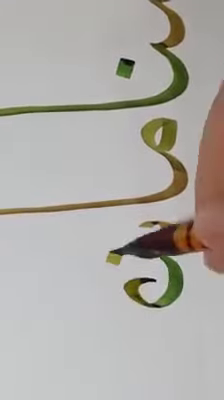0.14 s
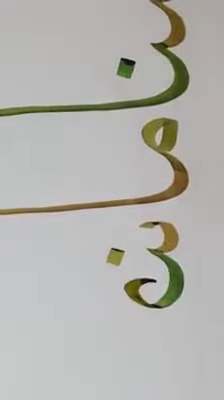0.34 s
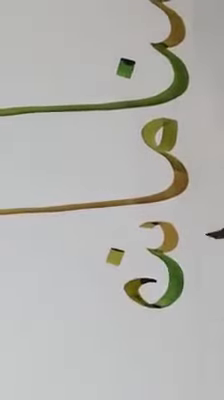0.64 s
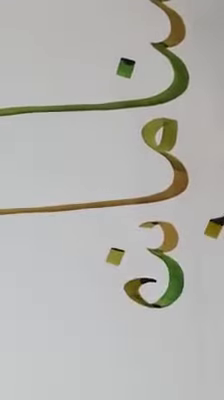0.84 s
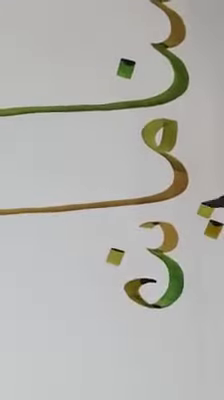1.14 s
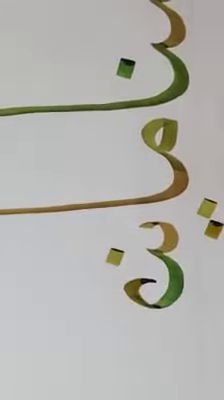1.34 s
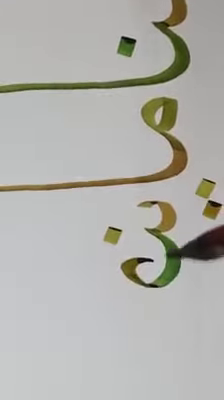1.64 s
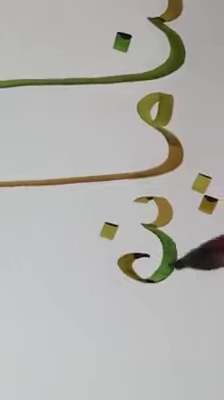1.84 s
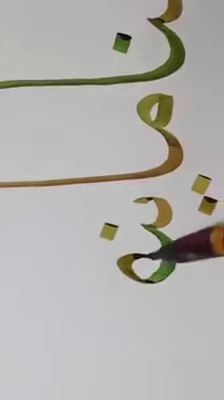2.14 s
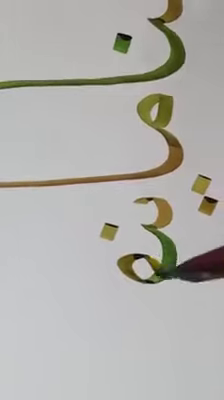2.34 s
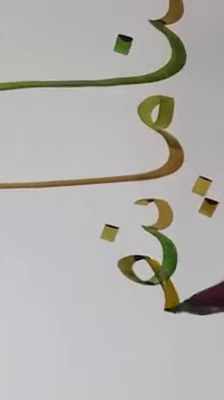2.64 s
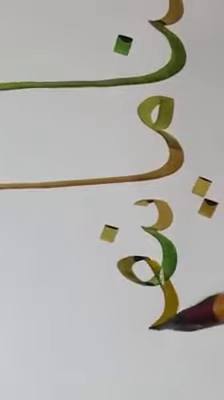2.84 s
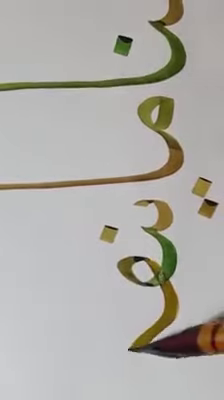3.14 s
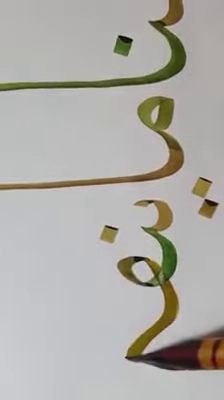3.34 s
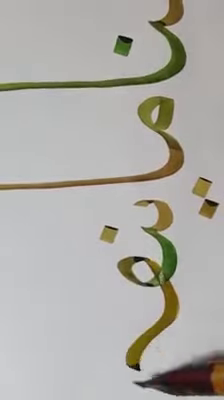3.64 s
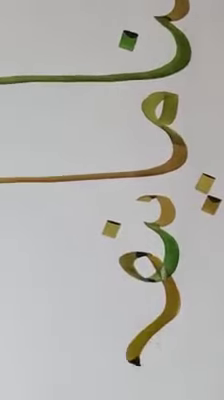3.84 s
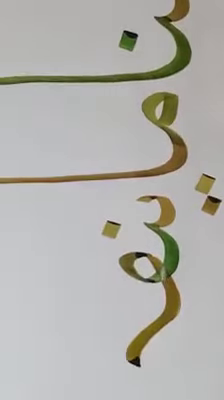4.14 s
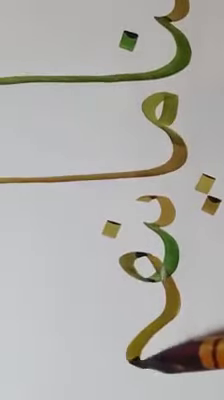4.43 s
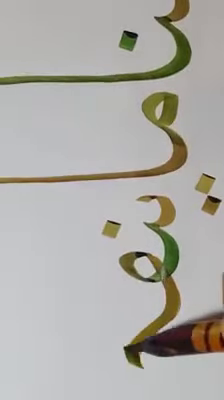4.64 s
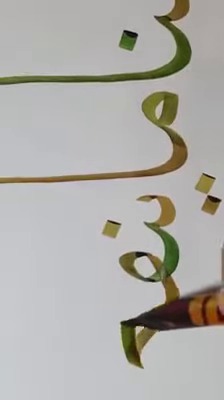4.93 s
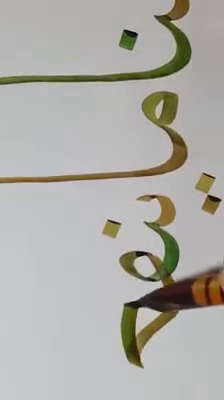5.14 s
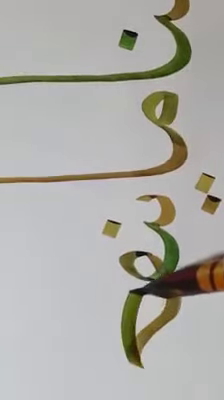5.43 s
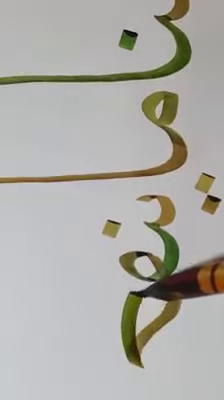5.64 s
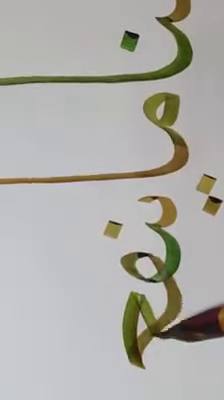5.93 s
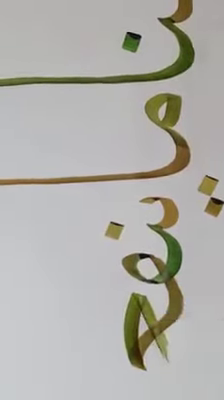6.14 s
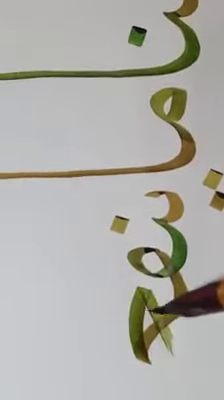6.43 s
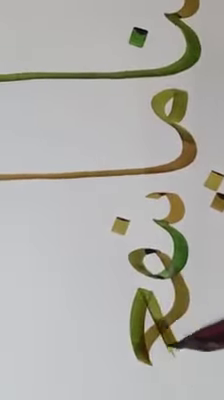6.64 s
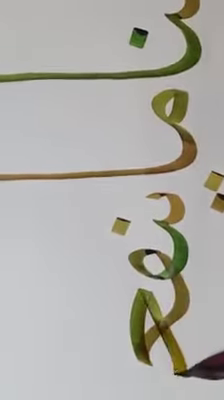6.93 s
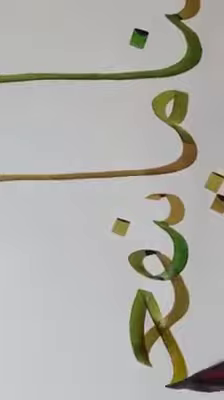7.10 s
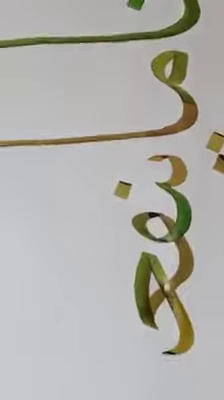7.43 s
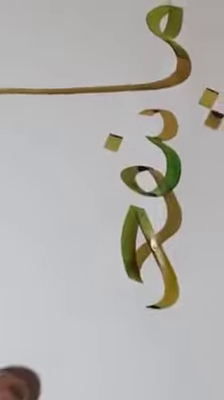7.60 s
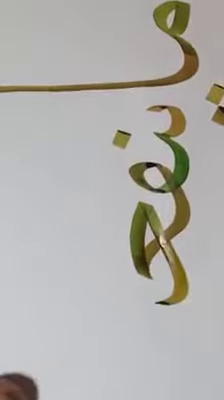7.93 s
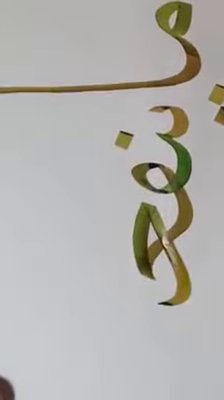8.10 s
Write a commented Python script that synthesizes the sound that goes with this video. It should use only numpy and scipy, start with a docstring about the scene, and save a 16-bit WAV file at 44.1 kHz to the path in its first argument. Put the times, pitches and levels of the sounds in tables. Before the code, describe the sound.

Close, dry calligraphy sounds: soft hand rubs and thuds, crisp nib clicks, one strong scrape ending in a chirpy flick, quiet hum beneath.

```python
"""A desk in a quiet room, microphone close to the sheet: hum and faint hiss lie underneath throughout.
First the writing hand slides and bumps, with faint ticks and one flick just before 1 s. Near 2.4 s the broad
nib snaps in loud ticks, then stutters and ticks finely until the hand is left alone near 4 s. Slow pulls
follow, then the strongest scrape at 5.8 s and the loudest flick, a chirp near 6 s. More ticks and strokes
lead to sharp flicks at 7.3 s; the hand slides on to the end, with a last faint flick and stroke."""
import sys
import numpy as np
from scipy import signal
from scipy.fft import rfft, irfft
from scipy.io import wavfile
from scipy.ndimage import uniform_filter1d

SR = 44100
rng = np.random.default_rng(int(sys.argv[2]) if len(sys.argv) > 2 else 0)


def bounce(signal):
    """Save signal as a 16-bit WAV file at the path given by the first command-line argument."""
    frames = np.transpose(np.atleast_2d(signal))
    limited = np.clip(frames, -1, 1)
    pcm = np.round(limited * 32767).astype(np.int16)
    wavfile.write(sys.argv[1], SR, pcm)


N = 364266
TIME = np.arange(N) / SR
TOP_HZ = 9750  # upper limit of the recorder


def undb(db):
    """Decibels to amplitude gain."""
    return 10 ** (np.asarray(db) / 20)


def unit(x):
    """Scale to rms 1."""
    return x / np.sqrt(np.mean(x ** 2))


def add(out, x, start_s):
    """Mix x into out from start_s on."""
    i = max(int(start_s * SR), 0)
    out[i:i + len(x)] += x[:len(out) - i]


def colour(x, spectrum, size=8192):
    """Causal minimum-phase filter with the given spectrum, from the cepstrum of its log gain; rms 1."""
    point_hz, point_db = np.transpose(spectrum)
    hz = np.maximum(np.fft.rfftfreq(size, 1 / SR), 1)
    gain_db = np.interp(np.log(hz), np.log(point_hz), point_db)
    cepstrum = irfft(np.log(undb(gain_db)))
    # fold the cepstrum onto positive time, so that nothing sounds early
    cepstrum[1:size // 2] *= 2
    cepstrum[size // 2 + 1:] = 0
    response = irfft(np.exp(rfft(cepstrum)))
    return unit(signal.fftconvolve(x, response)[:len(x)])


def resonate(x, hz, width_hz):
    """One resonance, gain 1 at its centre."""
    return signal.lfilter(*signal.iirpeak(hz, hz / width_hz, fs=SR), x)


def band(x, low_hz, high_hz):
    """Band-pass without delay."""
    return signal.sosfiltfilt(signal.butter(2, [low_hz, high_hz], "band", fs=SR, output="sos"), x)


def dull(x, corner_hz):
    """Gentle one-pole roll-off of the treble."""
    pole = np.exp(-2 * np.pi * corner_hz / SR)
    return signal.lfilter([1 - pole], [1, -pole], x)


def walk(rate_hz):
    """Smooth random wander of rms near 1, with rate_hz new targets a second."""
    step = int(SR / rate_hz)
    targets = np.repeat(rng.standard_normal(N // step + 1), step)
    return unit(uniform_filter1d(targets, step)[:N])


def grains(rate_hz, spread_db):
    """Random tiny slips, at a rate that may change: many small, a few large; rms 1."""
    hit = rng.random(N) < rate_hz / SR
    size = undb(spread_db * np.minimum(rng.exponential(size=N), 3))
    sign = rng.choice([-1, 1], N)
    return unit(hit * size * sign / np.sqrt(rate_hz))  # even power when the rate changes


def swell(rise_s, fall_s, size=4096):
    """Envelope that grows exponentially to 1 and dies away, and the time of its top."""
    top_s = size / 3 / SR
    t = np.arange(size) / SR - top_s
    return np.exp(np.where(t < 0, t / rise_s, -t / fall_s)), top_s


def gesture(start_s, length_s, attack_s, release_s):
    """Attack, hold and release of one movement, and its progress from -1 to 1."""
    t = TIME - start_s
    attack = np.clip(t / attack_s + .5, 0, 1)
    release = np.clip((length_s - t) / release_s + .5, 0, 1)
    return attack * release, np.clip(2 * t / length_s - 1, -1, 1)


# spectrum of the quiet room's hiss: freq_hz, density_db
ROOM_SPECTRUM = [(25, 1), (45, 1), (70, 1.5), (110, -4), (250, -2), (340, -13.5), (560, -18), (1270, -21.5),
                 (1360, -11.5), (1450, -21), (3500, -22.5), (6500, -28), (9000, -33), (11000, -53)]


def room_tone(hum_hz=49, waver_hz=5, hum_db=-65.5, hiss_db=-65):
    """All around: a low sine hum that wavers in pitch and strength, and smooth filtered-noise hiss."""
    pitch_hz = hum_hz + waver_hz * walk(rate_hz=26)
    phase = 2 * np.pi * np.cumsum(pitch_hz) / SR
    hum = unit(np.sin(phase)) * undb(hum_db + 3.0 * walk(rate_hz=13))
    hiss = colour(rng.standard_normal(N), ROOM_SPECTRUM)
    return hum + hiss * undb(hiss_db + .5 * walk(rate_hz=3))


def reflections(x, wet_db=-19, gap_s=0.0011, t60_s=.09, size=8192):
    """A weak, very short echo from the desk and things near it: a decaying noise tail."""
    t = np.arange(size) / SR
    decay = np.exp(-np.log(1000) * t / t60_s) * (t > gap_s)
    tail = band(rng.standard_normal(size), 180, 10000) * decay
    return undb(wet_db) * signal.fftconvolve(x, tail / np.linalg.norm(tail))[:N]


# the hand slides over the sheet, close by: start_s, length_s, desk_rumble_db, skin_hiss_db
SLIDES = [(0.06, 0.14, -60, -81), (0.183, 0.061, -69, -64), (0.291, 0.11, -58, -72),
          (0.437, 0.075, -56.5, -67), (0.762, 0.089, -53, -61), (1.08, 0.093, -63, -72.5),
          (1.169, 0.11, -55, -71), (1.313, 0.063, -54, -57.5), (1.451, 0.1, -65, -66.5),
          (1.611, 0.097, -57, -63.5), (1.725, 0.12, -59.5, -70.5), (1.895, 0.06, -67, -71),
          (2.175, 0.29, -68.5, -78), (2.435, 0.052, -56.5, -54.5), (2.553, 0.048, -58, -68.5),
          (2.606, 0.15, -59.5, -71), (3.153, 0.39, -65.5, -77.5), (3.565, 0.19, -60.5, -64.5),
          (3.777, 0.12, -57, -67.5), (3.972, 0.093, -56.5, -65.5), (4.516, 0.15, -68.5, -79),
          (4.66, 0.15, -62, -67.5), (4.818, 0.10, -59, -67.5), (4.942, 0.14, -62, -72.5),
          (5.333, 0.086, -50, -56), (5.913, 0.097, -57.5, -68), (6.015, 0.077, -54.5, -66.5),
          (6.13, 0.09, -50, -54.5), (6.237, 0.09, -56, -65), (6.637, 0.23, -65, -76),
          (6.993, 0.06, -55.5, -68.5), (7.076, 0.11, -58.5, -64), (7.21, 0.1, -52.5, -58.5),
          (7.335, 0.074, -59, -62.5), (7.441, 0.11, -61, -66), (7.705, 0.081, -55, -67.5),
          (7.864, 0.099, -54.5, -62.5), (8.001, 0.069, -52, -62)]
# spectrum of the desk top's rumble: freq_hz, density_db
RUMBLE_SPECTRUM = [(50, -34), (100, -16.5), (160, -12.5), (190, -4.5), (232, -6), (264, 2.5), (282, -4.5),
                   (310, -9), (368, -18), (392, -12.5), (425, -17), (500, -32.5), (900, -52)]
# spectrum of skin hissing on paper: freq_hz, density_db
SKIN_SPECTRUM = [(280, -12), (400, 3.5), (540, -2.5), (670, 1), (930, -3), (1130, -7), (1400, -7.5),
                 (1900, -7.5), (3400, -7.5), (4500, -12.5), (6500, -16.5), (9000, -21.5), (12000, -43)]


def hand(ends_lift_db=0.5, judder_db=2.5):
    """Skin judders over the sheet, a touch louder at a slide's ends: the desk rumbles, the paper hisses."""
    # the resting hand is never quite still
    rumble = np.full(N, undb(-74.5))
    hiss = np.full(N, undb(-83))
    for start_s, length_s, rumble_db, hiss_db in SLIDES:
        gate, progress = gesture(start_s, length_s, attack_s=0.042, release_s=0.04)
        push = gate * undb(ends_lift_db * progress ** 2)
        rumble = np.maximum(rumble, push * undb(rumble_db))
        hiss = np.maximum(hiss, push * undb(hiss_db))
    judder = undb(judder_db * walk(rate_hz=54))
    desk = colour(grains(rate_hz=1500, spread_db=1), RUMBLE_SPECTRUM)
    skin = colour(grains(rate_hz=6000, spread_db=1.5), SKIN_SPECTRUM)
    return (desk * rumble + skin * hiss) * judder


# bumps of hand and pen on the desk: top_s, envelope_peak_db, pitch_hz, rise_s, fall_s
BUMPS = [(0.749, -46.5, 256, 0.0034, 0.014), (0.942, -42.5, 913, .003, 0.0032),
         (1.568, -38.5, 173, 0.0014, 0.004), (2.113, -64, 945, 0.0038, 0.0038),
         (2.441, -41, 536, 0.00065, 0.0032), (2.467, -44.5, 148, 0.0046, 0.0047),
         (2.569, -38.5, 208, 0.0042, 0.0024), (3.357, -44.5, 225, 0.0015, 0.009),
         (3.70, -40, 258.7, 0.011, 0.025), (4.27, -61, 783, .008, 0.0079),
         (4.331, -50.5, 686, 0.0007, 0.0015), (4.964, -49, 195, 0.0062, 0.022),
         (5.318, -53, 880, .001, 0.0044), (5.682, -50, 266, 0.0052, 0.0049),
         (5.987, -40, 115, 0.0051, 0.0054), (6.195, -46.5, 395, 0.018, 0.011),
         (6.929, -37, 261.4, 0.0048, 0.0081), (7.095, -55, 700, 0.0064, 0.0043),
         (7.278, -44.5, 756, 0.0018, 0.0036), (7.327, -46, 636, .001, 0.0026),
         (7.33, -44, 117, 0.0014, 0.0075), (7.404, -50, 630, .002, 0.0046)]


def bumps():
    """A light contact stirs one well-damped motion of the desk: a sine under a brief swell."""
    out = np.zeros(N)
    for time_s, db, hz, rise_s, fall_s in BUMPS:
        envelope, top_s = swell(rise_s, fall_s)
        t = np.arange(len(envelope)) / SR - top_s
        thud = envelope * np.sin(2 * np.pi * hz * t)
        add(out, undb(db) * thud, time_s - top_s)
    return out


# resonances of nib and shaft: freq_hz, width_hz, level_db
NIB_MODES = [(1580, 160, -14), (1790, 110, -9), (2354, 60, -11), (2990, 120, -2), (3150, 140, 0),
             (3350, 80, -4), (3580, 70, -7), (3850, 100, -3), (4135, 45, -11), (4767, 48, -6),
             (5066, 45, -7), (5550, 70, -8), (5842, 70, -9), (6250, 300, -14), (7150, 400, -17),
             (9000, 900, -16)]
# spectrum radiated straight from the paper fibres: freq_hz, density_db
FIBRE_SPECTRUM = [(200, -10), (600, -9.5), (1200, -7.5), (1700, -1.5), (2650, 0.5), (3150, -2.5),
                  (4300, 3.5), (6100, 0.5), (6650, -17.5), (7200, -7), (9400, -16.5), (12000, -16)]


def nib(force, fibre_db):
    """A force at the tip rings the pen's modes; the fibres radiate it directly too, at fibre_db to the ring."""
    ring = 0
    for k, (hz, width_hz, db) in enumerate(NIB_MODES):
        ring = ring + (-1) ** k * undb(db) * resonate(force, hz, width_hz)  # neighbours in opposite phase
    return unit(unit(ring) + undb(fibre_db) * colour(force, FIBRE_SPECTRUM))


# strokes of the nib: start_s, length_s, relative_level_db, swell_db (from start to end)
STROKES = [(0.18, 0.05, -64, -3), (1.118, 0.034, -64, -8.5), (1.46, 0.045, -68, -4.5),
           (1.61, 0.1, -62, -12), (2.357, 0.132, -49.5, 9), (2.96, 0.1, -65.5, 13.5),
           (3.167, 0.35, -69.5, -7.5), (3.677, 0.034, -62.5, -2.5), (4.652, 0.13, -65, 8.5),
           (4.87, 0.22, -70, -7), (5.72, 0.04, -57.5, -1), (5.807, 0.097, -37, 1), (5.914, 0.086, -44, -2),
           (6.604, 0.037, -60, -4), (6.739, 0.085, -54, 7), (7.935, 0.035, -62.5, 7)]


def scrape(drag_db=1.5, flutter_db=2.5, gain_db=-2.5):
    """Stick-slip grains over an even drag; a faster stroke is louder and crosses more fibres."""
    speed = np.full(N, 1e-6)
    for start_s, length_s, db, swell_db in STROKES:
        gate, progress = gesture(start_s, length_s, attack_s=0.014, release_s=0.022)
        speed += gate * undb(db + swell_db * progress / 2)
    slip_rate_hz = 1100 * (speed / speed.max()) ** 0.5
    slips = grains(slip_rate_hz, spread_db=6.0)
    drag = undb(drag_db) * rng.standard_normal(N)
    flutter = undb(gain_db + flutter_db * walk(rate_hz=150))
    return nib(slips + drag, fibre_db=-2) * speed * flutter


# quick flicks of the nib: top_s, level_db, rise_s, fall_s, chirp_hz, chirp_over_scrape_db, treble_corner_hz
FLICKS = [(0.9399, -31, 0.0023, 0.0028, 1840, 2, 20000), (2.4667, -31, 0.004, 0.0033, 2230, 1, 6000),
          (2.4734, -34.5, 0.00073, 0.0045, 1830, 3, 6900), (3.642, -43.5, 0.0052, 0.0025, 1020, -4, 2000),
          (4.889, -48, 0.0076, 0.0071, 2990, -2, 7040), (5.963, -21, 0.011, 0.0037, 3740, -1.5, 12000),
          (6.607, -35.5, 0.0023, 0.0034, 3070, 4.5, 6950), (7.276, -34.5, 0.0027, 0.0048, 1330, 1, 1000),
          (7.3268, -27.5, 0.0011, 0.0022, 1300, 2.5, 1500), (7.328, -29.5, 0.0016, 0.002, 2200, 8.5, 1800),
          (7.959, -44.5, 0.0038, 0.0022, 3720, -6, 7200)]


def flicks(chirp_width_hz=480, low_cut_share=0.28):
    """A fast slip swells in milliseconds and the nib chatters at one pitch; a higher one has less body."""
    out = np.zeros(N)
    for time_s, db, rise_s, fall_s, hz, chirp_db, corner_hz in FLICKS:
        envelope, top_s = swell(rise_s, fall_s)
        drag, chatter = rng.standard_normal((2, len(envelope))) * envelope
        chirp = resonate(chatter, hz, chirp_width_hz)
        chirp = resonate(chirp, hz, chirp_width_hz)  # twice: steep skirts
        rasp = dull(nib(drag, fibre_db=-2.0), corner_hz)
        rasp = band(rasp, low_cut_share * hz, 2 * TOP_HZ)
        sound = unit(unit(rasp) + undb(chirp_db) * unit(chirp))
        envelope_rms = np.sqrt(np.mean(envelope ** 2))
        add(out, sound * envelope_rms * undb(db), time_s - top_s)
    return out


# slow pulls, where the nib stutters in faint ticks:
# start_s, length_s, ring_db (before the ring trim in ticks), tip_relative_db (before the tip trim)
STUTTERS = [(2.616, 0.06, -67, -5), (2.94, 0.07, -69.5, 1.5), (3.189, 0.11, -68, 6),
            (4.547, 0.12, -66.5, -7), (4.701, 0.088, -53, -7.5), (4.979, 0.13, -62, -4),
            (5.616, 0.045, -61, 0), (6.377, 0.1, -68.5, -6), (6.952, 0.03, -61.5, -0.5)]


def stutter_ticks(gap_s=0.025, scatter_db=3, slap_db=-5):
    """Faint ticks at uneven gaps through each slow pull, as rows like those of TICKS."""
    rows = []
    chances = rng.standard_normal((len(STUTTERS), 16, 3))
    for (start_s, length_s, db, tip_db), chance in zip(STUTTERS, chances):
        gaps = gap_s * np.exp(0.42 * chance[:, 0])
        lags = np.cumsum(gaps) - gaps[0] / 2
        for lag, (_, ring, bright) in zip(lags, scatter_db * chance):
            if lag < length_s:
                rows.append((start_s + lag, db + ring, slap_db, tip_db + bright))
    return rows


# single ticks of the nib, from loud snaps to very faint (levels before the trims in ticks):
# start_s, ring_db, paper_slap_relative_db, tip_brightness_relative_db
TICKS = [(0.176, -47, -10, 2), (0.183, -55, -2, 2.5), (1.5538, -63.5, 14, 12), (1.564, -43, -5, -9.5),
         (1.716, -59, -6, -7), (1.9096, -57, -8, -15), (2.1893, -62, -5, -3), (2.3514, -34, -21, -14),
         (2.363, -41, -15, -26), (2.4024, -33, -16, -29), (2.42, -37.5, -5, -6), (2.4395, -28, -6, -5.5),
         (2.733, -60.5, -2, 1), (2.778, -55.5, -2.5, 2.5), (2.806, -65.5, 1, 6), (3.015, -60, -23, 2),
         (3.044, -54, -24, 3.5), (3.0587, -58, -17, 8), (3.077, -57, -24.5, 2), (3.0851, -48.5, -14, 4.5),
         (3.1667, -52, -4, 2), (3.189, -44, -10, -9), (3.2257, -55, -4, 2), (3.249, -52, -10, 3),
         (3.2699, -50.5, -5, 2), (3.3197, -49.5, -7, -1), (3.3541, -40.5, -8.5, 3), (3.3773, -59, -1, 0),
         (3.4217, -57, -5, -2), (3.472, -61.5, 1, 11.5), (3.4974, -57.5, -2, 5), (3.5097, -57.5, -16, 0),
         (3.684, -49, -4, -4), (3.7045, -50.5, -1, -4), (4.6772, -53, -1.5, -3), (4.683, -53, -14, -9),
         (4.728, -53.5, -9, -15), (4.767, -48, -9, -11), (4.8379, -55.5, -5, -6), (4.915, -63, 8.5, -17),
         (4.9607, -54.5, -12, -5), (4.983, -57, -10, -4), (5.0802, -59.5, -12, -10), (5.4042, -60.5, 5, -7),
         (5.6088, -59, -4, 0.5), (5.7228, -41.5, -2, -10), (5.7399, -44.5, -2, -16), (5.8397, -33, -16, -9),
         (5.8549, -34, -11, -8), (5.8682, -35.5, -16, -13), (5.877, -33, -18, -10), (5.8844, -37, -25, -9),
         (5.9062, -34, -13, -5), (5.9295, -45, -17.5, -5), (6.5039, -54.5, 5, -7), (6.542, -48.5, -1, -8),
         (6.572, -45, -4.5, -14), (6.6508, -49.5, -10, -26), (6.739, -40, -13.5, -4),
         (6.783, -45.5, -6, -7), (6.8146, -48.5, -3, -14), (7.4026, -48, 2, -6.5), (7.6038, -59.5, 4, -2)]


def ticks(ring_trim_db=-3, slap_trim_db=-2.5, tip_trim_db=-3):
    """Each tick swells briefly out of faint noise, snaps within milliseconds and dies away, in three bands."""
    out = np.zeros(N)
    rows = TICKS + stutter_ticks()
    snap, top_s = swell(rise_s=0.00049, fall_s=0.0016)
    skirt, _ = swell(rise_s=0.0038, fall_s=0.0055)
    faint_skirt, _ = swell(rise_s=0.009, fall_s=0.007)
    envelope = snap + undb(-19) * skirt + undb(-34) * faint_skirt
    force = envelope * rng.choice([-1, 1], (len(rows), len(snap)))  # random signs: noise
    sound = nib(force.ravel(), fibre_db=18)
    times, db, slap_db, tip_db = np.transpose(rows)
    layers = [
        (band(sound, 500, 2550), slap_db + slap_trim_db),
        (band(sound, 2800, 3700), ring_trim_db),
        (band(sound, 4000, 11000), tip_db + tip_trim_db),
    ]
    for layer, layer_db in layers:
        for time_s, tick, gain in zip(times, layer.reshape(force.shape), undb(db + layer_db)):
            loudest = np.sqrt(uniform_filter1d(tick ** 2, size=176).max())  # rms over 4 ms
            add(out, gain * tick / loudest, time_s - top_s + 0.0011)  # snap tops 1.1 ms after start_s
    return out


def scene():
    """Pen and hand on the desk, close to the microphone, in the room."""
    writing = scrape() + flicks() + bumps() + hand() + ticks()
    return (writing + reflections(writing) + room_tone())[None]


def record(dry):
    """The recorder cuts the top with a steep elliptic low-pass."""
    return signal.sosfilt(signal.ellip(8, .2, 70, TOP_HZ, fs=SR, output="sos"), dry)


dry = scene()
out = record(dry)
bounce(out)
```